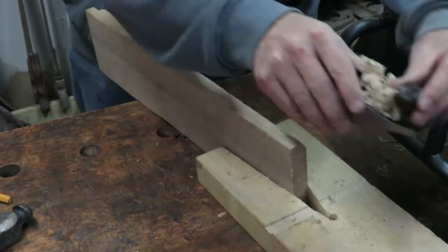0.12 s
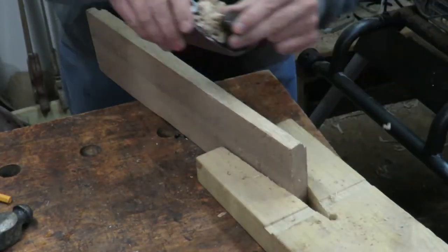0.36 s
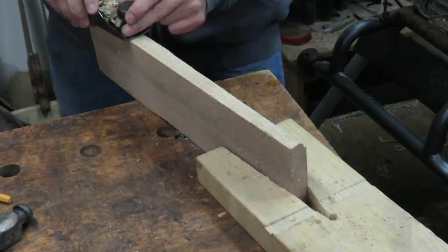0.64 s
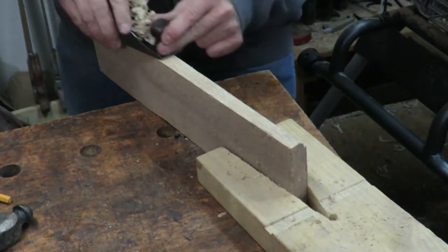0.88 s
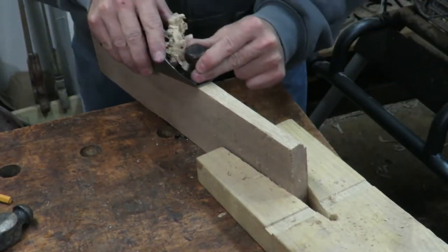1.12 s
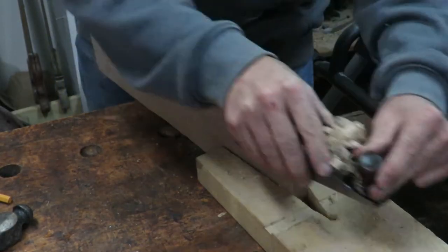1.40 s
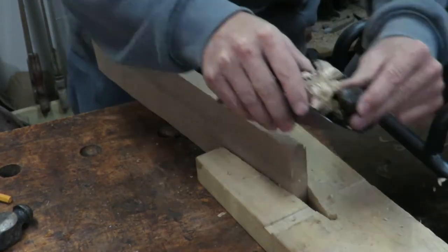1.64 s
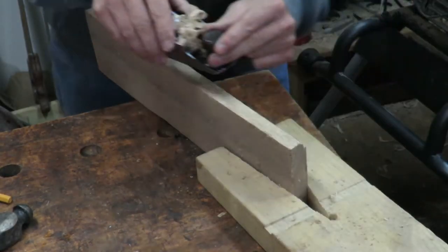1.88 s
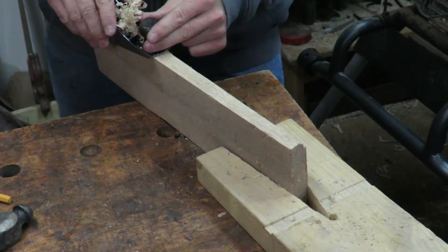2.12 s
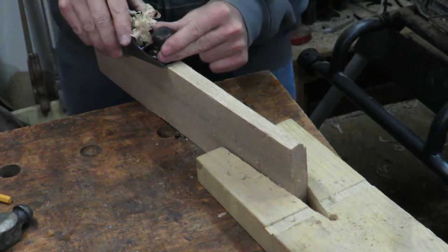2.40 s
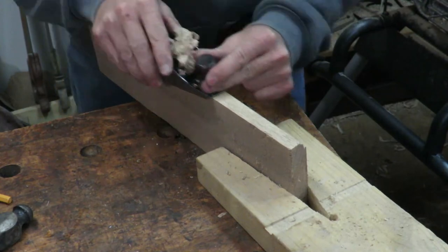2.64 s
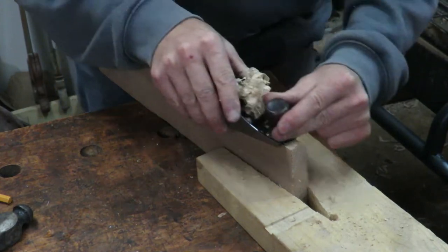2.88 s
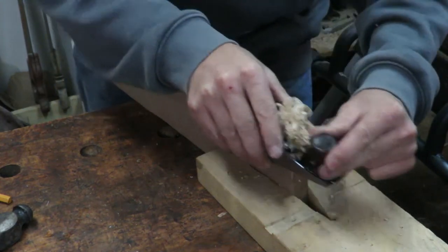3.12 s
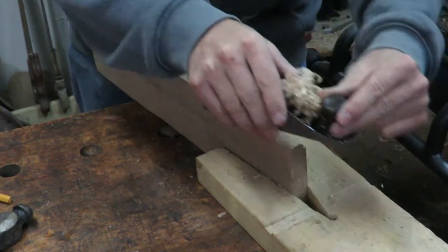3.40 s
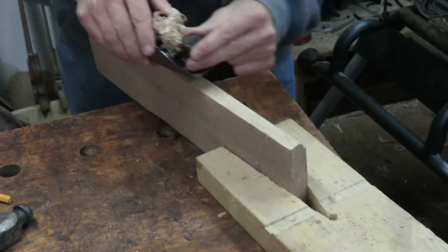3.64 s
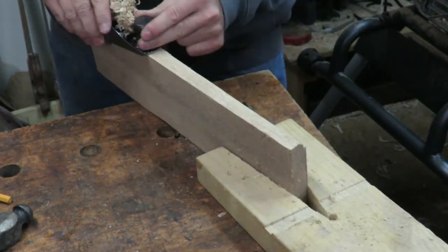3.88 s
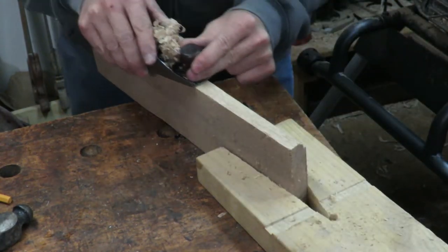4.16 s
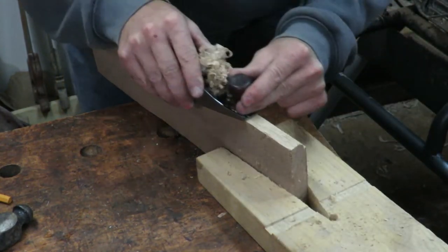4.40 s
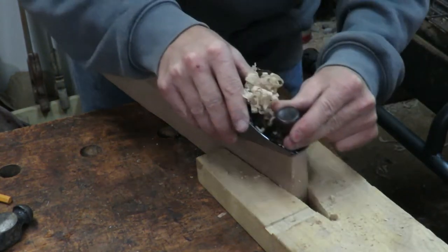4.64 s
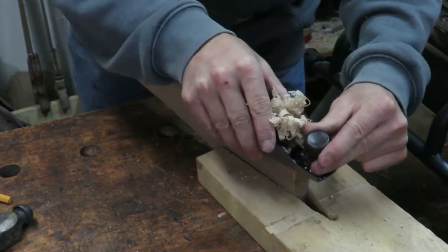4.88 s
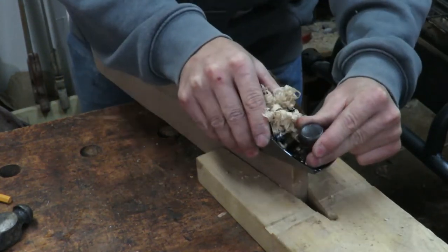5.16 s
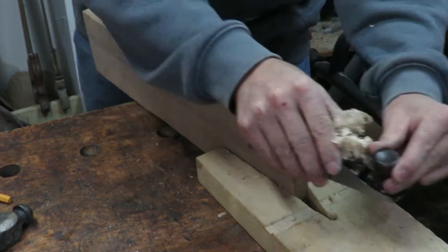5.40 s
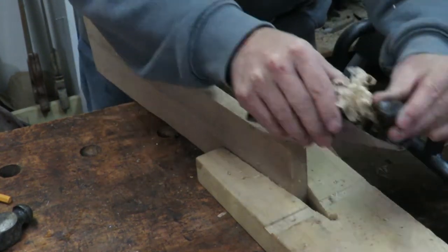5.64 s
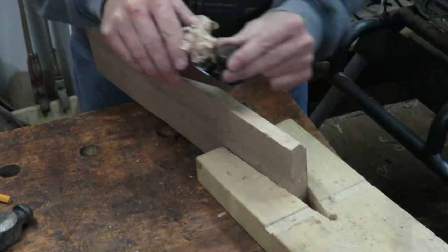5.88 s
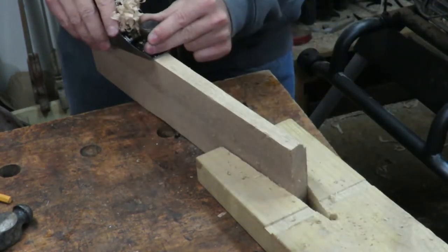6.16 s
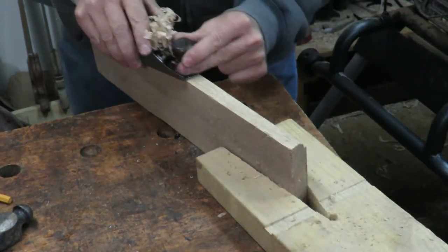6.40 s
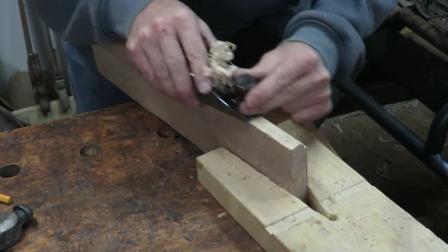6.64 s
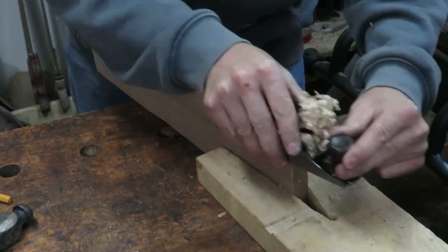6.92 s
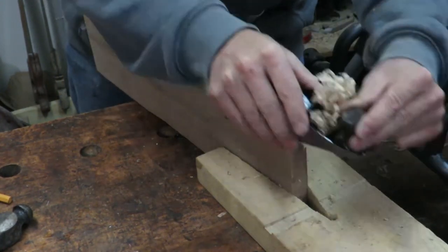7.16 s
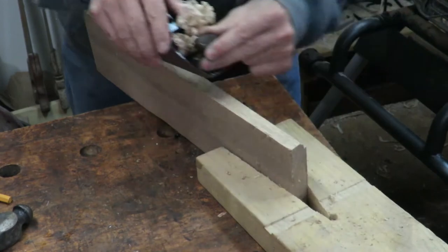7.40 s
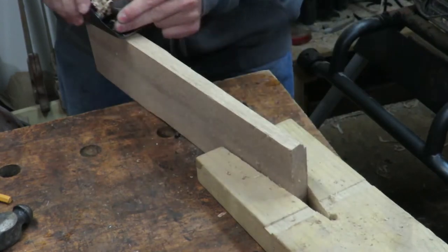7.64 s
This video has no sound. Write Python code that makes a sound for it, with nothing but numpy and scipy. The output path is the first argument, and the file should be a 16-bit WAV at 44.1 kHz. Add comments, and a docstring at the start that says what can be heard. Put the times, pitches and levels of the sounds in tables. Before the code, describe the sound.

Rhythmic hand planing of wood: double clacks as the plane touches down, swelling gritty shaving strokes, brief pauses, and dull bench bumps.

```python
"""Small workshop, 7.8 s: a short planing stroke first, then a hand plane lands on a board edge and bounces.
A long stroke follows: torn fibres as a low shudder, rasp and hiss, all rung by the modes of board and bench.
Thin flickering high tones begin just before the second landing; two more long strokes, a short one, a last long one.
Dull taps, dry ticks and short swells of narrow-band noise fall among them; landings are decaying noise bursts.
Throughout, sparse random echoes make the room's brief answer, and shaped noise makes the quiet floor."""
import sys
import numpy as np
from scipy import signal
from scipy.fft import rfft, irfft
from scipy.io import wavfile
from scipy.ndimage import uniform_filter1d

SR = 44100
rng = np.random.default_rng(int(sys.argv[2]) if len(sys.argv) > 2 else 0)


def elevation(decibels):
    """Turn decibel levels (scalar or array-like) into linear amplitude ratios."""
    levels = np.asarray(decibels, float)
    return 10 ** (levels / 20)


def log_audio(samples):
    """Write samples as a 16-bit WAV file to the path given in sys.argv[1]."""
    # one column per channel
    frames = np.atleast_2d(samples).T
    # limit to full scale, then quantise
    limited = np.clip(frames, -1, 1)
    pcm = np.round(limited * 32767).astype(np.int16)
    wavfile.write(sys.argv[1], SR, pcm)


N = 343098

# Workshop floor spectrum, relative: hz, level_db
FLOOR_SPECTRUM = [(20, -46), (45, -9), (100, -4.5), (190, -5.5), (270, -5.5), (560, -5.5), (1000, -13),
                  (3100, -25.5), (12800, -41.5), (15000, -48)]
# Left-right likeness of the floor: hz, correlation (0 to 1)
FLOOR_LIKENESS = [(60, 1), (150, 0.58), (300, 0), (1000, 0.051), (10000, 0)]
# Room decay: hz, t60_s
ROOM_DECAY = [(120, 0.37), (330, 0.34), (870, 0.27), (2300, 0.2), (6000, 0.23), (12000, 0.11)]
# Side tail against mid tail: hz, gain_db
ROOM_WIDTH = [(60, -29), (130, -29), (290, -12), (640, -19.5), (2000, -18.5), (6760, -13), (14900, -2)]
# Modes of board and bench: mode_hz, width_hz, gain_db
BOARD_MODES = [(144, 37, 8), (368, 210, 6), (455, 87, -3), (555, 26, 9.5), (621, 29, 5.5), (677, 8.2, 1.5),
               (789, 35, 3.5), (840.5, 36, 7), (985, 23, 9.5), (1031, 13.6, 11.5), (1073, 25, 2),
               (1135, 22, 3.5), (1221, 26, 7.5), (1276, 62, 0.5), (1400, 155, 2.5), (1490, 99, 6),
               (1750, 76, -2), (1964, 47, 2.5), (2540, 60, 2), (3040, 55, 4.5), (3250, 110, 4),
               (3644, 270, 4), (4780, 80, 0.5), (5080, 110, 4), (5680, 43, 8), (5530, 37, -9),
               (6700, 140, 3)]
# Modes of the plane iron: mode_hz, width_hz, gain_db
IRON_MODES = [(1985, 45, 4), (2700, 51, -1.5), (5270, 96, 8), (8430, 130, 4.5)]
# Thin flickering high tones, beginning just before the second landing: tone_hz, level_db, start_s, end_s
HIGH_TONES = [(5400, -65, 2.085, 2.18), (8700, -67, 2.11, 2.27), (9800, -65, 2.085, 2.2),
              (12295, -70, 2.085, 2.18)]
# Snaps of dry shavings: start_s, level_db
SHAVING_TICKS = [(0.5227, -45), (1.6427, -50), (3.5204, -53), (5.0898, -50)]
# Soft pushes on one low mode: start_s, level_db, pitch_hz, length_s
SOFT_TAPS = [(0.027, -33, 143, 0.032), (0.166, -41, 322, 0.018), (0.25, -35.5, 318, 0.034),
             (0.439, -39, 325, 0.034), (1.119, -24, 632, 0.043), (1.134, -23, 567, 0.015),
             (1.185, -28, 559, 0.03), (1.682, -37, 319, 0.036), (2.081, -41, 326, 0.045),
             (3.18, -27, 555, 0.023), (3.223, -19.5, 132, 0.026), (3.255, -23.5, 143, 0.04),
             (4.109, -29.5, 136, 0.026), (5.125, -35, 110, 0.022), (5.155, -35.5, 144, 0.028),
             (5.42, -21, 139, 0.051), (5.871, -36, 328, 0.049), (5.941, -34.5, 350, 0.032),
             (6.077, -39, 303, 0.029), (7.535, -36.5, 328, 0.031), (7.577, -41, 234, 0.02)]
# Short swells of noise in a narrow band, within or beside the strokes: start_s, level_db, centre_hz
NARROW_RASPS = [(1.295, -31.5, 5400), (1.418, -23.5, 3200), (1.43, -24, 2300), (2.418, -43, 2840),
                (2.757, -38, 3200), (3.044, -34.5, 2700), (5.47, -44, 1950), (6.687, -25.5, 1980),
                (6.775, -27.5, 2690), (6.77, -36.5, 5230)]
# Plane on wood: start_s, body_peak_db, body_hz, snap_db and crack_db relative to the body
PLANE_KNOCKS = [(0.762, -8, 500, 1, -4.5), (0.8, -9.5, 640, -5.5, -25), (0.825, -21.5, 530, -12, -28),
                (1.347, -18.5, 770, -13, 2), (2.178, -10.5, 820, 0.5, -13), (2.261, -13, 614, -4.5, -28),
                (2.451, -20, 640, -16, -12), (3.879, -16, 657, -3.5, -13), (3.961, -18.5, 670, -9.5, -24),
                (4.939, -26.5, 595, -6, -23), (5.383, -17, 557, -24, -18), (6.168, -17.5, 570, -6.5, -19)]
# Crack colour of a knock, relative: hz, level_db
CRACK_COLOUR = [(1500, -9), (3000, 2), (4200, -1.5), (5500, -3), (8000, -13), (20000, -43)]
# One list a stroke: time_s, blade_bite_db, sole_slide_db, shudder_hz
PLANE_STROKES = [
    [(0.0, -36, -37, 505), (0.028, -42.5, -46, 389), (0.042, -33.5, -52, 427), (0.072, -36.5, -56, 428),
     (0.18, -61, -75.5, 327)],
    [(0.85, -29, -57, 540), (0.896, -42, -57.5, 363), (0.934, -34, -50.5, 807), (1.094, -39.5, -42.5, 614),
     (1.128, -29.5, -52.5, 620), (1.176, -38.5, -57, 557), (1.246, -22.5, -42.5, 656),
     (1.302, -34, -39.5, 600), (1.376, -34, -37, 800), (1.47, -29, -36, 510), (1.612, -52, -79, 287),
     (1.712, -53, -60, 343), (1.808, -59, -72, 245), (1.86, -56, -72, 314)],
    [(2.33, -41, -75, 230), (2.394, -37, -52.5, 690), (2.618, -26, -52, 630), (2.672, -23.5, -46, 795),
     (2.734, -33.5, -40.5, 566), (2.932, -28.5, -42.5, 850), (2.97, -21.5, -53.5, 690),
     (3.056, -17, -44, 760), (3.164, -25, -53, 500), (3.214, -23, -42, 630), (3.242, -35, -59, 208),
     (3.268, -37, -52, 173), (3.4, -57, -79, 197)],
    [(4.03, -48, -62, 654), (4.098, -26, -52, 728), (4.146, -27.5, -46, 730), (4.332, -36.5, -44, 795),
     (4.41, -24.5, -51, 644), (4.444, -31, -46.5, 800), (4.602, -20.5, -46, 860), (4.722, -16.5, -51, 600),
     (4.82, -19.5, -47, 650), (4.854, -23.5, -52, 564), (4.914, -38, -65, 513), (4.956, -28.5, -58.5, 550),
     (5.052, -54, -72.5, 484), (5.14, -52, -65, 202)],
    [(5.24, -67, -86, 315), (5.268, -56, -72, 556), (5.38, -24, -52, 463), (5.448, -33, -61.5, 211),
     (5.504, -37, -55.5, 273), (5.66, -69, -81.5, 335)],
    [(6.2, -39, -57, 600), (6.332, -53.5, -70, 517), (6.382, -54, -57.5, 313), (6.432, -40.5, -48, 734),
     (6.586, -42, -44, 726), (6.65, -28.5, -45.5, 710), (6.758, -36.5, -41, 690), (6.9, -19, -44, 950),
     (6.948, -18.5, -41.5, 770), (6.992, -15, -49, 710), (7.032, -34.5, -55.5, 784),
     (7.122, -51, -60.5, 737), (7.2, -49, -79, 361)],
]
# Rasp colour, relative: hz, level_db
RASP_COLOUR = [(300, -8.5), (800, 1.5), (1500, -4.5), (3200, -8), (4500, -13.5), (9000, -37)]
# Hiss colour, relative: hz, level_db
HISS_COLOUR = [(2000, -15.5), (4000, -3), (5500, -6), (7500, -10), (10000, -16), (13000, -17),
               (15000, -27.5), (20000, -19)]


def read(points, hz):
    """Table interpolated on a log-frequency axis."""
    point_hz, value = np.transpose(points)
    return np.interp(np.log(hz + 1), np.log(point_hz + 1), value)


def evened(x):
    """Scaled to rms 1."""
    return x / np.sqrt(np.mean(x ** 2) + 1e-20)


def add(mix, start_s, sound):
    """Mixes a sound in at a time, cut at the end of the mix."""
    part = mix[max(round(start_s * SR), 0):][:len(sound)]
    part += sound[:len(part)]


def hump(hz, centre_hz, octaves):
    """Bell of gain 1 on a log-frequency axis."""
    return np.exp(-.5 * (np.log2((hz + 1) / centre_hz) / octaves) ** 2)


def causal(gain):
    """Minimum-phase taps for a gain given from 0 Hz to half the sample rate."""
    both_sides = np.r_[gain, gain[-2:0:-1]]
    log_gain = np.log(np.maximum(both_sides, 1e-5))
    return np.fft.ifft(np.exp(np.conj(signal.hilbert(log_gain)))).real[:len(gain)]


def modes_gain(modes, hz):
    """Each mode lifts, or dips if negative, its own band."""
    return elevation(sum(db / (1 + (2 * (hz - mode_hz) / width_hz) ** 2) for mode_hz, width_hz, db in modes))


def board_gain(hz):
    """Response of board and bench."""
    return modes_gain(BOARD_MODES, hz)


def through_board(force):
    """Force on the edge rings the board modes."""
    taps = causal(board_gain(np.fft.rfftfreq(16384, 1 / SR)))
    return signal.oaconvolve(force, taps)[:len(force)]


def floor():
    """Workshop air and microphone hiss: lumpy stereo noise, more alike in the bass."""
    floor_rms_db, lump_rms_db = -48, 3.1
    frames, hz = N // 256 + 5, np.fft.rfftfreq(1024, 1 / SR)
    a, b, c, d, lumps = rng.standard_normal((frames, 513, 5)).T
    lumps = evened(uniform_filter1d(uniform_filter1d(lumps, 8, 0), 12, 1))
    likeness = np.clip(read(FLOOR_LIKENESS, hz), -1, 1)[:, None]
    left = a + 1j * b
    right = likeness * left + np.sqrt(1 - likeness ** 2) * (c + 1j * d)
    spectrum = np.array([left, right])
    spectrum *= elevation(read(FLOOR_SPECTRUM, hz)[:, None] + lump_rms_db * lumps)
    noise = signal.istft(spectrum, nperseg=1024, noverlap=768)[1][:, :N]
    return elevation(floor_rms_db) * evened(noise)


def room(x):
    """Sparse echoes of random sign, each band dying at its own speed: one tail for mid, one for side."""
    tail_over_direct_db = -4.5
    echoes = np.zeros((2, SR))
    at = np.arange(80, SR - 20, 20) + rng.integers(0, 20, (2, (SR - 81) // 20))
    np.put_along_axis(echoes, at, rng.choice([-1., 1.], at.shape), 1)
    hz, t, spectrum = signal.stft(echoes, SR, nperseg=256)
    spectrum = spectrum * elevation(-60 * t / read(ROOM_DECAY, hz)[:, None])
    spectrum /= np.sqrt(np.sum(abs(spectrum) ** 2, axis=2, keepdims=True))  # equal energy in every band
    tail = signal.istft(spectrum, SR, nperseg=256)[1]
    tail /= np.linalg.norm(tail, axis=1, keepdims=True)
    mid_tail, side = signal.fftconvolve(x[None], tail, axes=1)[:, :N]
    width_taps = causal(elevation(read(ROOM_WIDTH, np.fft.rfftfreq(2048, 1 / SR))))
    side = signal.oaconvolve(side, width_taps)[:N]
    mid = (x + elevation(tail_over_direct_db) * mid_tail) / np.sqrt(1 + elevation(2 * tail_over_direct_db))
    return np.array([mid + side, mid - side])


def high_tones():
    """Thin high sine tones that flicker in level and drift in phase."""
    flicker_rms_db, drift_rms_rad = 5.2, 0.8
    out = np.zeros(N)
    noises = rng.standard_normal((len(HIGH_TONES), 2, 12000))
    for (hz, db, start_s, end_s), noise in zip(HIGH_TONES, noises):
        t = np.arange(0, end_s - start_s, 1 / SR)
        flicker, drift = (evened(uniform_filter1d(n, 200))[:len(t)] for n in noise)
        tone = elevation(db + flicker_rms_db * flicker) * np.sin(2 * np.pi * hz * t + drift_rms_rad * drift)
        add(out, start_s, np.sqrt(2) * tone * signal.windows.tukey(len(t), .4))
    return out


def ticks():
    """Snaps of dry shavings: bright noise with a millisecond decay."""
    decay_s = 0.0013
    out, t = np.zeros(N), np.arange(400) / SR
    for (start_s, db), noise in zip(SHAVING_TICKS, rng.standard_normal((len(SHAVING_TICKS), 402))):
        bright = evened(np.diff(noise, 2))
        add(out, start_s, elevation(db) * bright * np.exp(-t / decay_s))
    return out


def taps():
    """Soft pushes: one low mode swells, wobbles in phase and fades, with a dull noise puff."""
    wobble_rms_rad, puff_rms = 0.21, 0.36
    out = np.zeros(N)
    for (start_s, db, hz, length_s), noise in zip(SOFT_TAPS, rng.standard_normal((len(SOFT_TAPS), 2, 4000))):
        t = np.arange(0, min(length_s, .08), 1 / SR)
        wobble = evened(uniform_filter1d(noise[0], 300))[:len(t)]
        puff = evened(uniform_filter1d(uniform_filter1d(noise[1], 24), 24))[:len(t)]
        ring = np.sin(2 * np.pi * hz * t + wobble_rms_rad * wobble) + puff_rms * puff
        swell = np.sin(np.pi * (t / t[-1]) ** 0.53)
        add(out, start_s, elevation(db) * swell * ring)
    return out


def narrow_rasps():
    """Short swells of noise in a narrow band, within or beside the strokes."""
    length_s, width_octaves = 0.042, 0.08
    out, hz = np.zeros(N), np.fft.rfftfreq(4096, 1 / SR)
    for (start_s, db, centre_hz), noise in zip(NARROW_RASPS, rng.standard_normal((len(NARROW_RASPS), 4096))):
        band = irfft(rfft(noise) * hump(hz, centre_hz, width_octaves))
        grit = evened(band)[:round(length_s * SR)]
        add(out, start_s, elevation(db) * grit * np.hanning(len(grit)))
    return out


def knocks():
    """One blow and a dense rattle of the iron sole: board body, woody snap, bright crack, bench thump."""
    out, hz, t = np.zeros(N), np.fft.rfftfreq(4096, 1 / SR), np.arange(4096) / SR
    board = board_gain(hz)
    noises = rng.standard_normal((len(PLANE_KNOCKS), 4, 4096))
    for (start_s, body_db, body_hz, snap_db, crack_db), noise in zip(PLANE_KNOCKS, noises):
        thump_db = -22 - 0.65 * snap_db  # a flat, soft landing snaps less and thumps the bench more
        # colour, peak dB, rattle decay s
        parts = [(hump(hz, body_hz, 0.59) * board, body_db, .015),
                 (hump(hz, 1570, 0.59) * board ** 0.35, body_db + snap_db, .013),
                 (elevation(read(CRACK_COLOUR, hz)), body_db + crack_db, .008),
                 (hump(hz, 135, 0.6), body_db + thump_db, .03)]
        for (colour, peak_db, decay_s), rattle in zip(parts, noise):
            force = rattle * np.exp(-t / decay_s)
            force[0] = 4.9  # first contact
            blow = signal.fftconvolve(force, causal(colour))[:4096]
            add(out, start_s, elevation(peak_db) * blow / abs(blow).max())
    return out


def fibres(per_s, spread_db, smooth):
    """Fibres parting one by one in uneven sizes, plus a smooth share of rubbing noise."""
    size = elevation(spread_db * np.minimum(rng.exponential(1, N), 5)) * rng.choice([-1., 1.], N)
    parting = rng.random(N) < per_s / SR
    return evened(size * parting) + smooth * rng.standard_normal(N)


def stroke_controls(t):
    """Bite, slide and shudder pitch over time, interpolated within each stroke."""
    controls = np.zeros((3, len(t))) + [[-120], [-120], [500]]  # between strokes
    for rows in PLANE_STROKES:
        time_s, *columns = np.transpose(rows)
        on = (t >= time_s[0]) & (t <= time_s[-1])
        controls[:, on] = [np.interp(t[on], time_s, column) for column in columns]
    return controls


def cutting():
    """Tearing fibres force the board; bite and slide colour and level them frame by frame."""
    hz, t, _ = signal.stft(np.zeros(N), SR, nperseg=512, noverlap=384)
    bite_db, slide_db, shudder_hz = stroke_controls(t)
    rasp_db = 8.5 + 0.76 * slide_db + 0.23 * bite_db  # mostly the slide, a little the bite
    hiss_db = 6.0 + 1.114 * slide_db  # dies faster than the slide
    rumble_db = 0.26 * bite_db - 40
    # past -43 dB of slide the rasp climbs and its peak sharpens
    fast_db = np.maximum(slide_db + 43, 0)
    rasp_hz = 1830 * 2 ** (0.09 * fast_db)
    rasp_peak = 1 + 0.1 * fast_db
    hz = hz[:, None]
    iron = modes_gain(IRON_MODES, hz)
    shudder = hump(hz, shudder_hz, 0.44) + 0.21 * hump(hz, 1.13 * shudder_hz, 0.91)
    bench_rumble = hump(hz, 140, 1.0)
    rasp = elevation(read(RASP_COLOUR, hz)) * (0.5 + rasp_peak * hump(hz, rasp_hz, 0.47)) * iron
    hiss = elevation(read(HISS_COLOUR, hz)) * iron
    # colour, level dB, fibres, patch rms dB
    layers = [(shudder, bite_db, fibres(2500, 1.9, 0.76), 1.6),
              (bench_rumble, rumble_db, fibres(270, 2.4, 0.47), 1.8),
              (rasp, rasp_db, fibres(3000, 3.56, 0.61), 2.8),
              (hiss, hiss_db, fibres(5000, 3.6, 0.96), 2.6)]
    cutting_now = bite_db > -119
    spectrum = 0
    for colour, db, grains, patchy_db in layers:
        colour = colour / np.sqrt(np.mean((colour * board_gain(hz)) ** 2, axis=0))
        # the grain of the wood comes in patches
        patches = rng.standard_normal((len(t), len(hz))).T
        patches = evened(uniform_filter1d(uniform_filter1d(patches, 4, 0), 16, 1))
        grain_spectrum = signal.stft(evened(grains), SR, nperseg=512, noverlap=384)[2]
        spectrum = spectrum + grain_spectrum * colour * elevation(db + patchy_db * patches) * cutting_now
    force = signal.istft(spectrum, SR, nperseg=512, noverlap=384)[1][:N]
    return through_board(force)


def scene():
    """Plane and board in the room, over the floor."""
    plane = cutting() + narrow_rasps() + knocks()
    return room(plane + taps() + ticks() + high_tones()) + floor()


def top_cut(x):
    """Nothing passes above the cut-off."""
    return signal.sosfilt(signal.butter(12, 15460, fs=SR, output="sos"), x)


def record(dry):
    """The microphone drops the deepest bass and the top."""
    low_cut_hz, top_cut_hz = 45, 15400
    low_cut = signal.sosfilt(signal.butter(4, low_cut_hz, "high", fs=SR, output="sos"), dry)
    top_taps = signal.firwin(255, top_cut_hz, fs=SR)[None]
    limited = signal.oaconvolve(low_cut, top_taps, "same", axes=1)
    return top_cut(limited)


dry = scene()
out = record(dry)
log_audio(out)
```